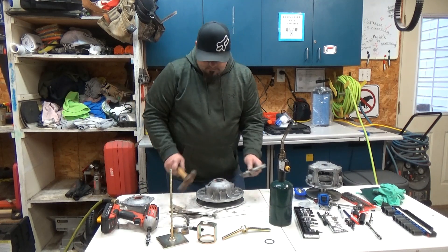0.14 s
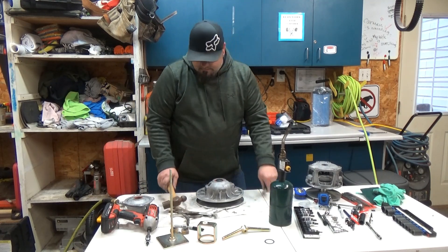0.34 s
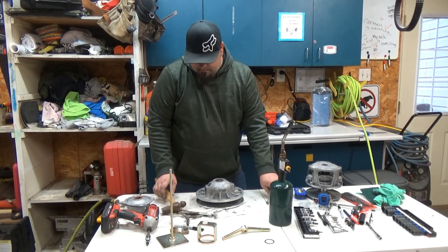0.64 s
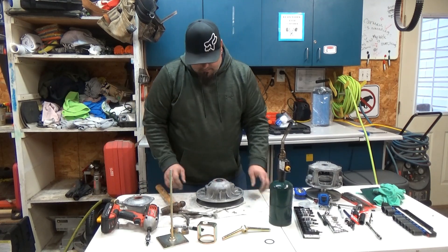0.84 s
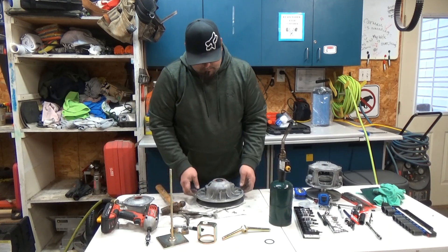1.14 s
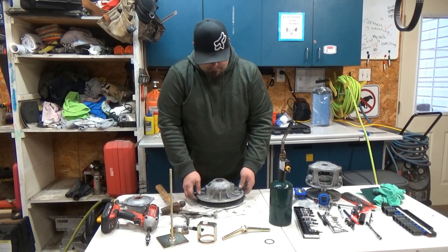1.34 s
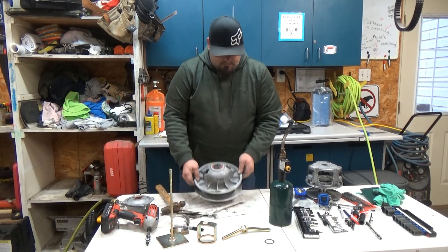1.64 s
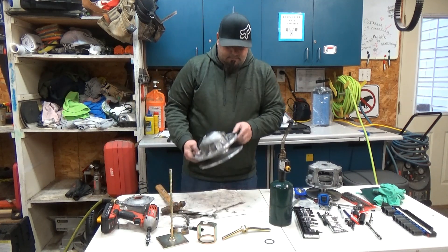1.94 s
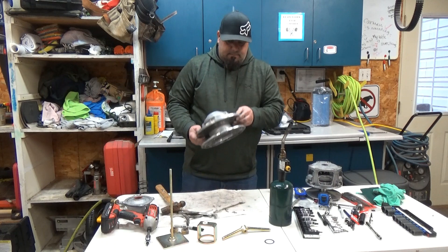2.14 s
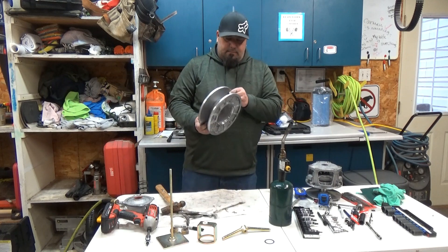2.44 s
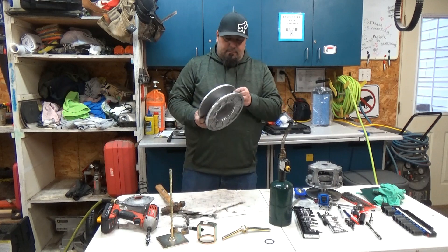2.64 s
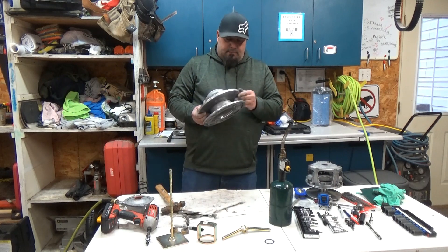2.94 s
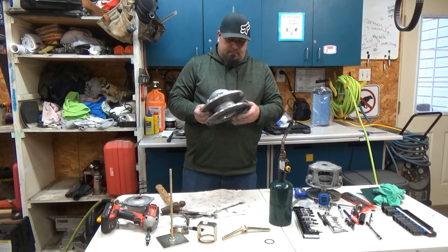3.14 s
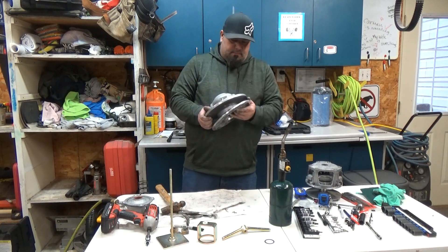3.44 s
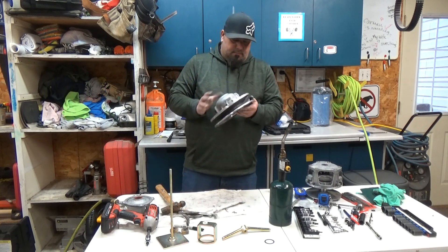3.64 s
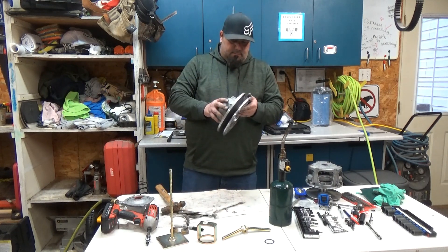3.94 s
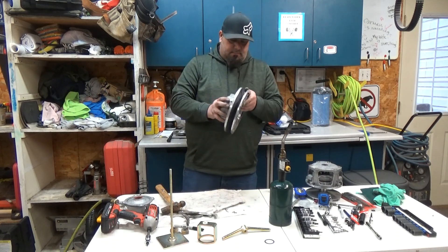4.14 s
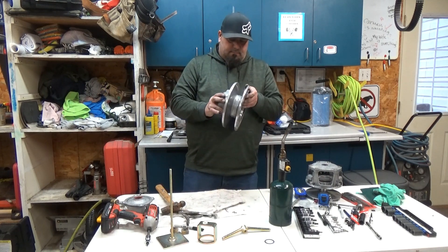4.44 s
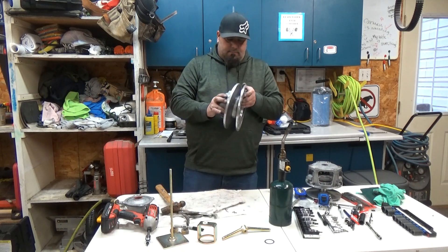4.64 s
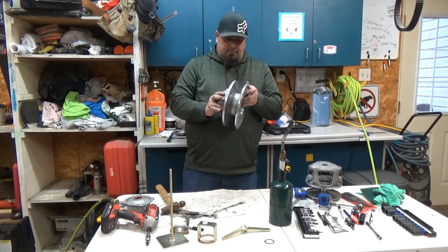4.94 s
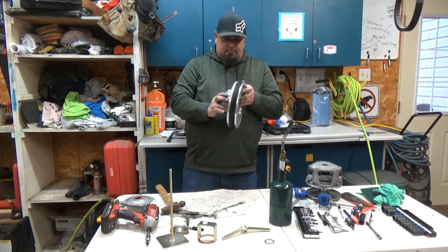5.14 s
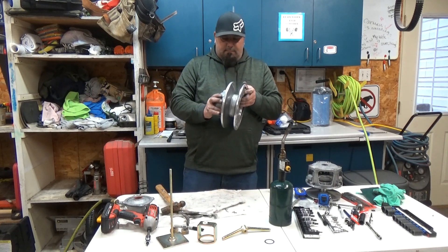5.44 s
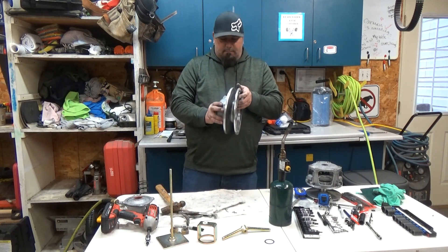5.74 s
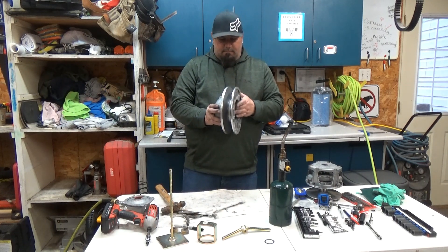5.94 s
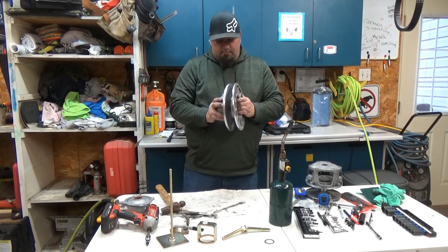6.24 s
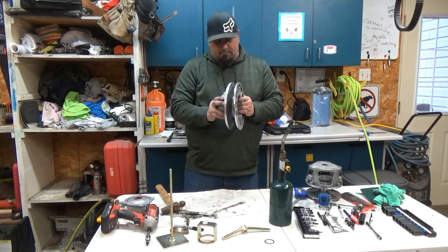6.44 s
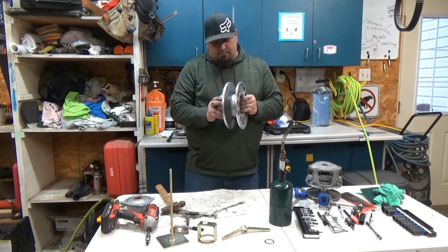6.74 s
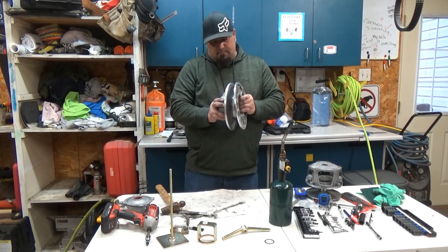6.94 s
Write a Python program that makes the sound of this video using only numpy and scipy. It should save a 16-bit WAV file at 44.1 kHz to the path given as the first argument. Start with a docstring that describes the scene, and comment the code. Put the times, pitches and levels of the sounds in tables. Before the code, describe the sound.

Tool bumps and a short drag give way to irregular bright metallic clangs and rattling clacks from a handheld pulley clutch in a small workshop.

```python
"""The loose parts of a metal pulley clutch knock as a man turns it over: clangs, duller clacks and a bouncing sheave.
Each blow is a burst of filtered noise (crowded, damped modes) plus a ring of clear, beating, decaying modes.
A hammer laid on the table and the clutch lifted off it add bumps, tool clicks, dragging and sliding friction.
A small, hard-walled workshop reverberates the clatter and friction, over steady hiss and a very faint ticking;
a fast peak limiter flattens the loudest blows."""
import sys
import numpy as np
from scipy import signal
from scipy.fft import rfft, irfft
from scipy.io import wavfile
from scipy.ndimage import uniform_filter1d, minimum_filter1d

SR = 44100
rng = np.random.default_rng(int(sys.argv[2]) if len(sys.argv) > 2 else 0)


def dump_mix(stems):
    """Bounce the given channels to the path in sys.argv[1] as a 16-bit WAV at rate SR."""
    frames = np.atleast_2d(stems).T  # one column per channel
    limited = np.clip(frames, -1, 1)  # hard clip at full scale
    pcm = np.round(limited * 32767).astype(np.int16)
    wavfile.write(sys.argv[1], SR, pcm)


N = 311787

# clear modes of the clutch with its parts apart: f/Hz, relative level/dB, t60 of the free ring/s
CLANG_MODES = [(1358, -17, 0.69), (1605, -17.5, 0.37), (1908, -6, 0.53), (1924.4, -5, 0.42),
               (2023, -10, 0.71), (2402, -16, 0.6), (2628, -14, 0.49), (2732, -15, 0.4),
               (3326, -16.5, 0.38), (3870, -19, 0.45), (4040, -24, 0.59), (8070, -27.5, 0.42)]
# crowded, quickly damped modes of the clutch with its parts together: f/Hz, relative level/dB
CLACK_BODY = [(90, -49.5), (380, -7), (600, -2), (880, 7.5), (1350, 2), (1800, -7), (3000, -9), (3800, -8),
              (6000, -17), (9600, -18), (15500, -40.5)]


def amp(db):
    """Level to amplitude: 20 dB are a factor of ten."""
    return 10 ** (np.asarray(db) / 20)


def evened(x):
    """Normalization: scales a signal to rms 1."""
    return x / np.sqrt(np.mean(x ** 2) + 1e-20)


def read(points, hz):
    """Interpolation along a log-frequency axis, as pitch is heard."""
    f, value = np.transpose(points)
    return np.interp(np.log(hz + 1), np.log(f + 1), value)


def add(mix, s, sound):
    """Superposition: adds a sound at time s, which may lie before the start."""
    at = round(s * SR)
    sound = sound[..., max(-at, 0):]
    part = mix[..., max(at, 0):][..., :sound.shape[-1]]
    part += sound[..., :part.shape[-1]]


def coloured(x, points):
    """Zero-phase filtering: multiplies the spectrum of x by a table of gains."""
    hz = np.fft.rfftfreq(x.shape[-1], 1 / SR)
    return irfft(rfft(x) * amp(read(points, hz)), x.shape[-1])


def causal(x, db):
    """Minimum-phase filtering by a gain in dB per bin: nothing sounds ahead of the attack."""
    log_gain = np.log(amp(np.concatenate([db, db[-2:0:-1]])))
    response = np.exp(np.conj(signal.hilbert(log_gain)))[:len(db)]
    return irfft(rfft(x) * response)


def smooth_steps(x, count):
    """Linear interpolation: joins slow values by straight lines, count samples each."""
    slope = np.diff(x, append=x[..., -1:])
    ramp = np.arange(count, dtype=np.float32) / count
    return (x[..., None] + slope[..., None] * ramp).reshape(*x.shape[:-1], -1)


def stereo(mid, side):
    """Spatial coherence: two close microphones hear nearly the same, so the side signal is weak."""
    # side against mid: f/Hz, level/dB
    side_gain = [(120, -17), (450, -9), (6000, -9), (13000, -22)]
    side = coloured(side, side_gain)
    return np.array([mid + side, mid - side])


def dying_sines(modes, early_db=3.5, early_s=0.1):
    """Modal decay: each mode swings up in about two cycles, dies faster while parts touch, then rings free."""
    t = np.arange(SR) / SR
    hz, _, t60 = np.transpose(modes)[..., None]
    swing_up = 1 - np.exp(-(hz * t / 2) ** 2)
    early_loss = 1 + amp(early_db) * np.exp(-t / early_s)
    free_ring = np.exp((2j * np.pi * hz - np.log(1000) / t60) * t)
    return (free_ring * (swing_up * early_loss)).astype(np.complex64)


def blows(rows, body, modes, body_t60, crack_db, split_hz=5.35, scatter_db=0.5, hard_hz=4500,
          ripple_db=3.5, spot_db=7.5, spot_width=0.065):
    """Impact excitation: crack, clatter of crowded modes, clear ring; returns clatter, ring, ring off axis."""
    t = np.arange(SR) / SR
    hz = np.fft.rfftfreq(SR, 1 / SR)
    mode_hz, mode_db, _ = np.transpose(modes)
    sines = dying_sines(modes)
    crack = amp(crack_db - 60 * t / 0.017)
    fade = amp(-60 * t / body_t60) + crack
    out = np.zeros((3, N))
    for s, level_db, treble_db, ring_db, *favoured_hz in rows:
        # a harder contact lifts the treble, and the place struck may favour one band
        tilt = treble_db * hz ** 2 / (hz ** 2 + hard_hz ** 2)
        for f in favoured_hz:
            tilt = tilt + spot_db * np.exp(-((hz / f - 1) / spot_width) ** 2)

        # every point of impact favours other modes
        smooth_noise = uniform_filter1d(rng.standard_normal(len(hz)), size=70)
        ripple = ripple_db * evened(uniform_filter1d(smooth_noise, size=50))
        ripple *= hz / (hz + hard_hz / 2)  # the random ripple fades out toward the bass

        # the parts chatter as they settle
        chatter = amp(4.47 * evened(uniform_filter1d(rng.standard_normal(SR), size=130)))
        burst = fade * chatter * rng.standard_normal(SR)

        # evens out the noise burst, so body, tilt and ripple set the colour
        burst_db = 10 * np.log10(uniform_filter1d(abs(rfft(burst)) ** 2, size=200))
        clatter = evened(causal(burst, read(body, hz) + tilt + ripple - burst_db))

        # each clear mode is a close cluster of four that beats, differently on and off axis
        detune, a, b, c, d = rng.standard_normal((5, len(modes), 4, 1))
        cluster = np.array([a + 1j * b, c + 1j * d])
        beats = (cluster * np.exp(2j * np.pi * split_hz * detune * t[::100])).sum(2)
        power = np.mean(abs(beats * sines[:, ::100]) ** 2, axis=2, keepdims=True) / 2
        scatter = scatter_db * rng.standard_normal(len(modes))
        size = amp(mode_db + ring_db + np.interp(mode_hz, hz, tilt) + scatter)
        beats = (beats * size[:, None] / np.sqrt(power)).astype(np.complex64)
        ring = np.einsum("cmt,mt->ct", smooth_steps(beats, count=100), sines).real

        add(out, s, amp(level_db) * np.sqrt(1 / 20) * np.vstack([clatter, ring]))
    return out


def clangs():
    """Free vibration: a loose part touches, lands or rebounds at its stop and rings on."""
    # contacts: t/s, relative level/dB, treble/dB, ring/dB, favoured f/Hz
    contacts = [(3.278, -37, -14, -20, 960), (3.325, -10, -7, -14, 1574), (3.612, -39.5, 6, -10, 5000),
                (3.641, -26.5, -1, -3, 1400), (3.654, -2.5, 17.5, -1, 2600), (3.709, -9.5, 15.5, -3, 1990),
                (3.757, -14.5, 8.5, 2, 1970), (4.09, -35.5, -34, 10, 2070), (4.232, -32, -22, 4.5, 2130),
                (4.6865, -21.5, -2, -18, 3830), (4.7125, -12.5, -13, 3, 1965), (5.133, -28.5, 14, 4, 4000),
                (5.146, -7.5, -2, -4, 3800), (5.2, -6, 4, -6.5, 3300), (5.668, -19.5, 5, -7, 1410),
                (5.683, -8.5, 1, 2, 4020), (5.728, -17.5, -3, 2, 2380), (6.018, -26.5, 1.5, 3, 1390),
                (6.068, -25, 4, -1, 3840), (6.086, -19.5, -16, 0.5, 1760), (6.215, -35, 7, -16, 3500),
                (6.84, -19, 2, -20, 910), (6.86, -9, -6.5, -1, 2030), (7.055, -12.5, 16, -4.5, 2650)]
    # crowded, quickly damped modes: f/Hz, relative level/dB
    body = [(100, -47.5), (320, -15.5), (1100, 5.5), (1750, 8), (2300, 3), (2650, 4), (2950, -5),
            (4100, 3.5), (4800, -7), (6000, -14.5), (11000, -17.5), (15500, -41.5)]
    return blows(contacts, body, CLANG_MODES, body_t60=0.11, crack_db=7.5)


def clacks():
    """Contact-loaded vibration: the parts slam together and rattle, metal on metal."""
    # slams: t/s, relative level/dB, treble/dB, ring/dB, favoured f/Hz
    slams = [(1.602, -29.5, 3.5, -16, 1370), (4.421, -10, 15.5, -0.5, 3280), (4.452, -18.5, 0, -0.5, 2000),
             (4.865, -18.5, 0, 5, 6450), (4.914, -15.5, 8, 3.5, 900), (4.939, -9.5, 11, -7, 9700),
             (5.447, -19.5, -3.5, -1, 880), (5.475, -15.5, 11.5, 1.5, 2650), (6.538, -35, -1, -1.5, 1400),
             (6.617, -6, 11.5, -2.5, 4560), (6.657, -10.5, 3.5, 2, 3400)]
    # clear modes with the parts pressed together: f/Hz, relative level/dB, t60 of the free ring/s
    modes = [(796, -23.5, 0.22), (896, -13.5, 0.74), (1388, -10.5, 0.41), (2024, -14, 0.77),
             (2490, -25, 0.49), (2590, -19, 0.78), (3900, -20, 0.41), (4800, -25, 0.091), (7300, -27, 0.33)]
    return blows(slams, CLACK_BODY, modes, body_t60=0.15, crack_db=11.5)


def drops():
    """Repeated impact: the sheave drops open and bounces."""
    # bounces: t/s, relative level/dB, treble/dB, ring/dB
    bounces = [(2.163, -20, 18.5, -6.5), (2.183, -12.5, 16.5, -9.5), (2.204, -19.5, 4, 2),
               (2.231, -16, 6.5, -5.5)]
    # clear modes with the clutch hanging open: f/Hz, relative level/dB, t60 of the free ring/s
    modes = [(910, -12, 0.38), (1367, -5.5, 1), (2570, -12.5, 0.4), (2670, -11, 0.38), (3700, -7, 0.36),
             (4610, -19, 0.44), (4800, -19, 0.67), (7100, -15.5, 0.079), (7970, -15.5, 0.35)]
    return blows(bounces, CLACK_BODY, modes, body_t60=0.04, crack_db=-3)


def bumps():
    """Plate excitation: hammer and clutch bump the table top."""
    # bumps: t/s, relative level/dB, treble/dB, ring/dB
    contacts = [(-.03, -9.5, 33, -23.5), (.731, -4, 28, -13), (.768, -8, 8.5, -10), (.857, -19.5, 4, -12),
                (1.482, -33.5, 26, 5)]
    # clear modes of the table: f/Hz, relative level/dB, t60 of the free ring/s
    modes = [(242, -24, 0.33), (407, -6.5, 0.65), (2050, -22, 0.44)]
    # crowded, quickly damped modes of the table: f/Hz, relative level/dB
    body = [(90, -37), (122, -1), (400, 12), (900, 6.5), (2100, 4.5), (4000, -7.5), (8000, -28),
            (15500, -45)]
    return blows(contacts, body, modes, body_t60=0.16, crack_db=10.0, ripple_db=-3.0)


def clicks():
    """Short, hard contact: steel clicks against other tools."""
    # clicks: t/s, relative level/dB, treble/dB, ring/dB
    contacts = [(.564, -14, 6, -18), (1.18, -40, -12, -24), (1.39, -39, 2, 11.5)]
    # clear modes of the tools: f/Hz, relative level/dB, t60 of the free ring/s
    modes = [(3004, -8, 0.77), (6570, -3, 0.4)]
    # crowded, quickly damped modes of the tools: f/Hz, relative level/dB
    body = [(100, -1), (1000, 2.5), (2100, 11), (4300, 10), (5500, 11.5), (8000, 6.5), (10500, 7),
            (15500, -14)]
    return blows(contacts, body, modes, body_t60=.04, crack_db=39, ripple_db=1)


def rim():
    """Light damping: single rim modes sing on while the clutch hangs free; close pairs beat."""
    # rim modes: t/s, f/Hz, level/dB, t60/s
    rim_modes = [(1.69, 1370, -36, .8), (1.6, 1801, -44, 1.9), (2.23, 1373, -34, 1.8),
                 (2.23, 1362.7, -35.5, 1.8), (2.23, 1846, -33.5, 1.8), (1.6, 2686, -43, .7),
                 (1.57, 4140, -43, .5), (3.32, 4210, -27, .54), (5.2, 6320, -35, .67)]
    t, out = np.arange(2 * SR) / SR, np.zeros(N)
    for s, hz, db, t60 in rim_modes:
        swell = 1 - np.exp(-t / 0.017)
        decay = np.sqrt(2) * amp(db - 60 * t / t60)
        add(out, s, decay * np.sin(2 * np.pi * hz * t) * swell)
    return out


def rubbing(strokes, colour, rough_db, rise_db_per_s, fall_db_per_s):
    """Friction: tiny slips come in clumps under strokes that swell, hold and die away."""
    t = np.arange(N) / SR
    stroke_levels = []
    for start, length, db in strokes:
        rise = rise_db_per_s * np.maximum(start - t, 0)
        fall = fall_db_per_s * np.maximum(t - start - length, 0)
        stroke_levels.append(db - rise - fall)
    level_db = np.max(stroke_levels, axis=0)
    clumps = evened(uniform_filter1d(rng.standard_normal(N), size=500))
    slips = rng.standard_normal(N) * amp(rough_db * clumps)
    return amp(level_db) * evened(coloured(slips, colour))


def sliding(slide_s=0.014, sing_db=-4.0):
    """Friction-driven resonance: brief scrapes, mostly just before a part lands, set the clutch's modes singing."""
    # slides of metal on metal: t/s, relative level/dB
    slides = [(1.564, -35), (2.1, -43.5), (2.88, -50), (4.37, -39), (4.67, -36.5), (5.11, -34.5),
              (5.42, -29), (7.03, -26.5)]
    # spectrum of the scrape: f/Hz, relative level/dB
    colour = [(200, -12), (1000, 6.5), (4100, -2), (5800, -5), (10000, -15), (15500, -21)]
    strokes = [(s, slide_s, db) for s, db in slides]
    scrape = rubbing(strokes, colour, rough_db=0.5, rise_db_per_s=248, fall_db_per_s=132)
    ring = np.diff(dying_sines(CLANG_MODES).real.sum(0))  # tiny slips favour the high modes
    singing = signal.fftconvolve(scrape, ring / np.linalg.norm(ring))[:N]
    return scrape + amp(sing_db) * singing


def dragging():
    """Sliding friction: the clutch is pushed over the table."""
    # pushes: start t/s, length/s, relative level/dB
    pushes = [(.6, 0.42, -30), (1.21, 0.37, -36)]
    # spectrum of the rub: f/Hz, relative level/dB
    colour = [(60, -35), (130, -13.5), (290, 4.5), (550, 3.5), (1000, -6), (3000, -20.5), (15500, -51)]
    return rubbing(pushes, colour, rough_db=-1.5, rise_db_per_s=336, fall_db_per_s=125)


def room(x, direct_db=-5.5, early_db=-8.0, dull_hz=10000):
    """Reverberation: direct sound, near reflections and a dense tail in which each band dies at its own speed."""
    # reverberation time: f/Hz, t60/s
    band_t60 = [(120, 0.8), (400, 0.46), (1000, 0.51), (5000, 0.46), (15000, 0.3)]
    hz, t, z = signal.stft(rng.standard_normal((2, SR)), SR, nperseg=256)
    z = z / np.hypot(1, (hz[:, None] / dull_hz) ** 2)  # the cluttered walls return little of the top treble
    z = z * amp(-60 * t / read(band_t60, hz)[:, None])
    tail = signal.istft(z, SR, nperseg=256)[1][:, :SR]
    tail *= 1 - np.exp(-np.arange(SR) / SR / 0.0014)
    tail *= 0.44 / np.linalg.norm(tail[0])
    tail[0, 0] += amp(direct_db)
    for delay in (.0026, .0085, .016):  # seconds: table top, cupboards, ceiling
        tail[:, round(delay * SR)] += amp(early_db) * rng.choice([-1, 1], 2) / (1 + delay * 60)
    return signal.fftconvolve(x[None], stereo(*tail), axes=1)[:, :N]


def hiss(level_db=-50):
    """Stationary noise: the quiet hiss of the room, as filtered random noise."""
    # spectrum of the hiss: f/Hz, relative level/dB
    colour = [(25, -25.5), (767, 0), (1020, 0.5), (1550, -3.5), (3230, -3), (3780, -7), (12600, -10.5),
              (15500, -15)]
    noise = coloured(rng.standard_normal((2, N)), colour)
    return amp(level_db) * evened(stereo(*noise))


def ticking(tick_hz=3230, level_db=-60, decay_s=0.0027):
    """Periodic pulses: a very faint, even ticking of damped sines, thirty times a second."""
    age = (np.arange(N) / SR) % (1 / 30)  # seconds since the last tick
    return amp(level_db) * evened(age * np.exp(-age / decay_s) * np.sin(2 * np.pi * tick_hz * age))


def scene():
    """Superposition: clatter and rubs in the room, rings added directly, over hiss and ticking."""
    clatter, ring, ring_side = clangs() + clacks() + drops() + bumps() + clicks()
    rubs = dragging() + sliding()
    sources = room(clatter + rubs) + stereo(ring + rim(), ring_side)
    balance = amp([[-.25], [.25]])  # left slightly softer than right
    return sources * balance + hiss() + ticking()


def record(dry, limit_db=0.0, recovery_db_per_s=122.0, edge_hz=15600):
    """Gain reduction and band limiting: a fast peak limiter holds the blows down, and the band ends steeply."""
    peak = -minimum_filter1d(-abs(dry).max(0), size=60)
    fall = np.arange(N) / SR * recovery_db_per_s
    # the held peak level jumps up at once and sinks at the recovery rate
    held_db = np.maximum.accumulate(20 * np.log10(peak + 1e-9) + fall) - fall
    over_db = np.maximum(held_db - limit_db, 0)
    limited = dry / amp(uniform_filter1d(over_db, size=60))
    lowpass = signal.firwin(511, edge_hz, window=("kaiser", 9), fs=SR)
    return signal.oaconvolve(limited, lowpass[None], "same")


dry = scene()
out = record(dry)
dump_mix(out)
```